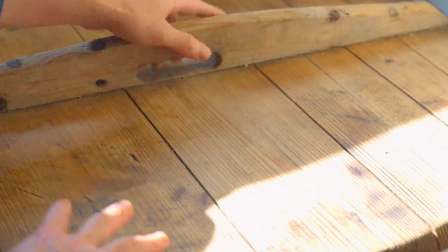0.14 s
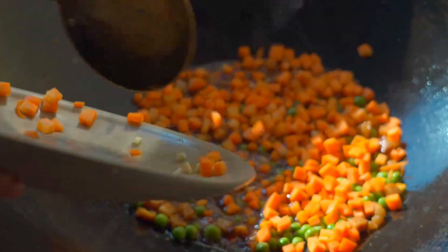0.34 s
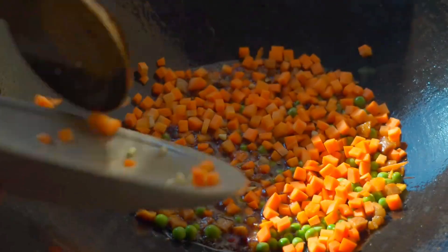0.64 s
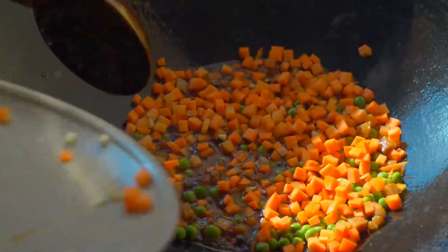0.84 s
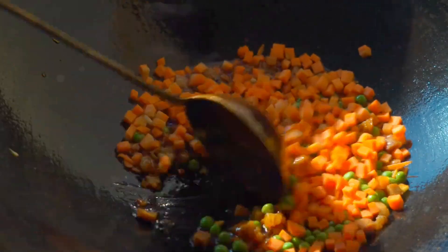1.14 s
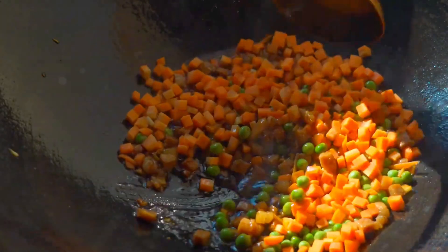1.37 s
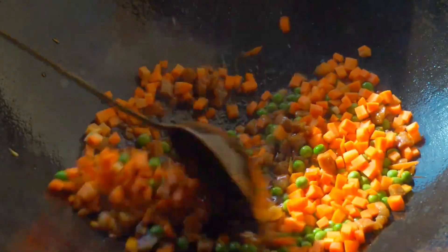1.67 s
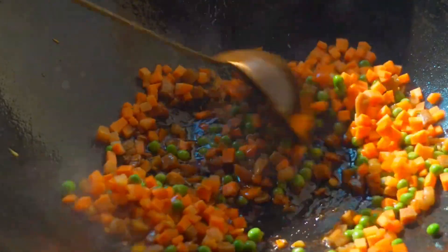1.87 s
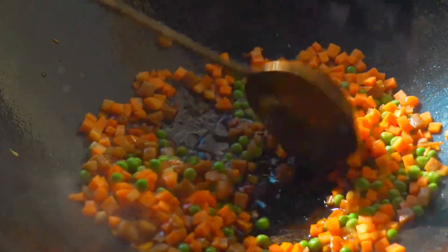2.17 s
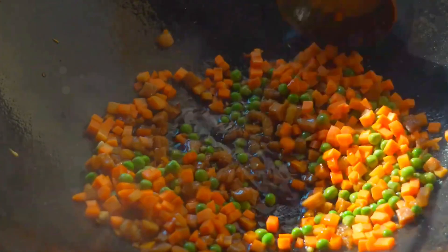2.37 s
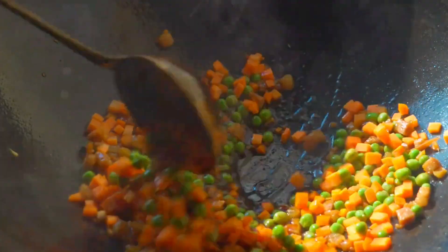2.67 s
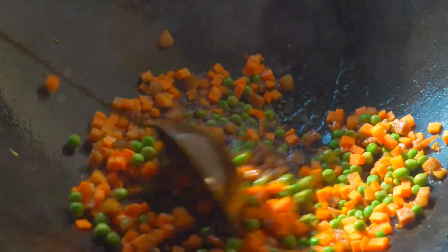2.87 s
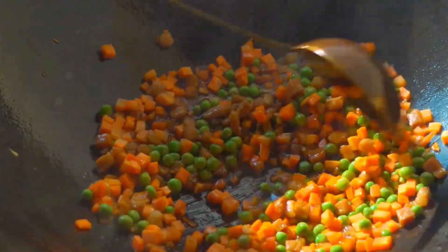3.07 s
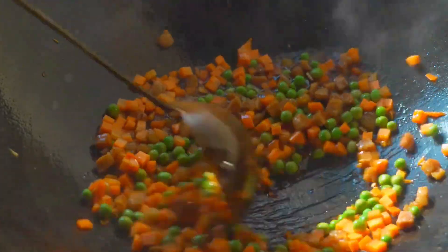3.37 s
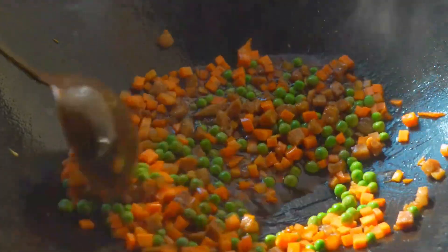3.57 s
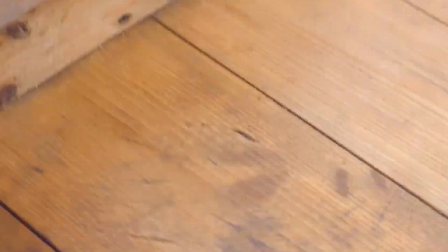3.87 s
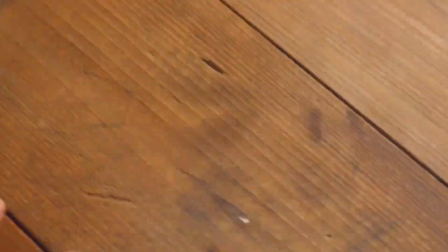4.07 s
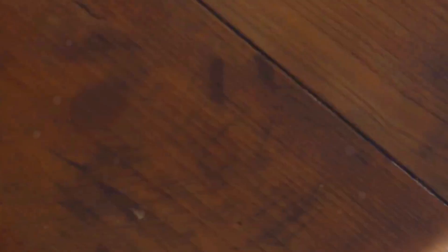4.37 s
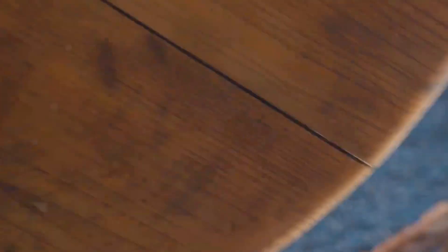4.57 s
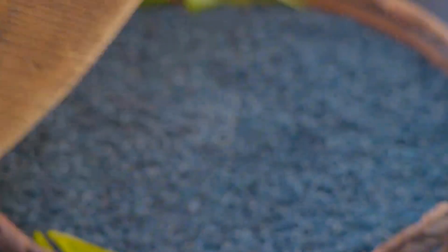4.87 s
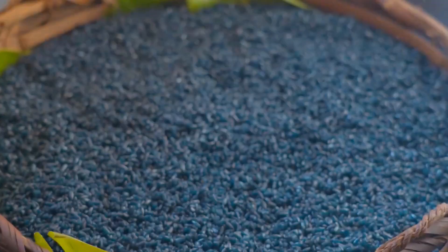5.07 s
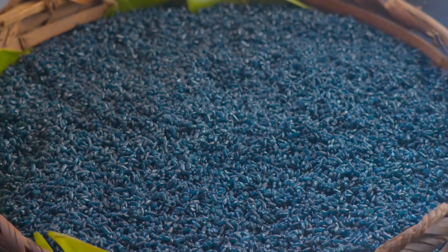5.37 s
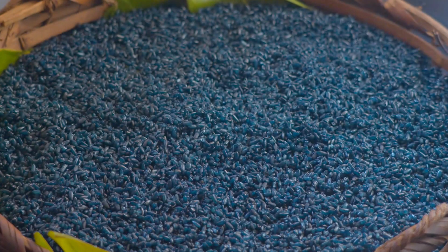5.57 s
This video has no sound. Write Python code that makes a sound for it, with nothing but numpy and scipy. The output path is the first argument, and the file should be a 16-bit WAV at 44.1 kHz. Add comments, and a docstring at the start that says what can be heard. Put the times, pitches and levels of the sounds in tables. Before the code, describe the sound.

Hard-cut cooking sounds: a quiet wooden rub, lively wok frying with clanking, scraping ladle, a tiny hush, then an even hiss of steam.

```python
"""Three moments of cooking joined by hard cuts. First a wooden lid slides in a quiet kitchen: coloured noise, treble lifted.
Then diced vegetables fry in a wok, flickering noise and pops over a droning burner (resonant noise), with spits of oil;
an iron ladle knocks the plate (struck modes), scrapes and squeaks on the steel (random slips through resonances).
After a short hush a steamer boils and hisses, again noise and pops over the burner.
A limiter ducks the sizzle after each loud knock."""
import sys
import numpy as np
from scipy import signal
from scipy.fft import rfft, irfft, next_fast_len
from scipy.io import wavfile

SR = 44100
rng = np.random.default_rng(int(sys.argv[2]) if len(sys.argv) > 2 else 0)


def transcribe(u):
    """Save the signal u as a 16-bit wav file named by the first command-line argument.

    u: samples, shape (n,) or (channels, n), limited to [-1, 1]; the rate is SR.
    q: integer samples, one column per channel.
    """
    v = np.clip(np.atleast_2d(u).T, -1, 1)
    q = np.round(v * 32767).astype(np.int16)
    wavfile.write(sys.argv[1], SR, q)


N = 251811

# quiet kitchen, one list before the frying and one after:
# (time [s], level [dB], treble gain above 1.5 kHz [dB])
HUSH = [
    [(0.0, -43, -2.5), (0.16, -41, 1), (0.19, -32.5, -1), (0.2, -30.5, 8), (0.222, -33, 9), (0.24, -37, 1),
     (0.282, -41, -2), (0.285, -40.5, 4)],
    [(3.762, -35, 14.5), (3.78, -40.5, 9), (3.795, -48, 2), (3.815, -45.5, 3), (3.88, -44, 0),
     (3.893, -40.5, 0)],
]
# spectrum of the quiet kitchen: (frequency [Hz], relative density [dB per Hz])
HUSH_COLOUR = [(15, -47), (25, -26), (75, -24), (108, -15.5), (169, -8.5), (373, -17.5), (497, -15.5),
               (926, -22), (1040, -22.5), (1780, -26.5), (2470, -27), (3000, -31), (4820, -31.5),
               (7600, -56), (9880, -101), (16700, -120)]
# burner drone: (time [s], level [dB])
DRONE = [(.3, -38.5), (1.8, -40), (2.4, -48), (3.76, -48), (3.9, -39.5), (4.3, -43.5), (4.6, -52),
         (5.71, -41.5)]
# boiling steamer: (time [s], level [dB])
BOIL = [(3.9, -23), (4.3, -21.5), (4.52, -23), (5.3, -23), (5.71, -22)]
# spectrum of the steamer: (frequency [Hz], relative density [dB per Hz])
BOIL_COLOUR = [(15, -62), (25, -29), (70, -23.5), (124, -9.5), (215, -12), (254, -7), (391, -8),
               (632, -5.5), (747, -3), (802, -3), (1330, -6.5), (2240, -2), (4280, -3), (5310, -5.5),
               (7600, -30.5), (9880, -46), (16700, -120)]
# sizzle: (time [s], level [dB])
FRY = [(.31, -23.5), (.56, -21.5), (.7, -24.5), (.9, -21), (1.04, -21.5), (1.1, -24), (1.15, -26),
       (1.27, -17), (1.31, -19), (1.35, -16), (1.385, -16), (1.394, -16), (1.412, -18.5), (1.43, -19),
       (1.52, -17), (1.6, -17.5), (1.68, -20.5), (1.71, -21.5), (1.75, -17), (1.84, -15.5), (2.03, -17),
       (2.25, -16.5), (2.295, -18), (2.36, -18), (2.82, -16), (2.857, -15), (2.868, -25), (2.888, -19),
       (2.91, -19), (2.97, -17), (3.22, -16), (3.37, -19), (3.47, -15.5), (3.76, -18.5)]
# spectrum of the sizzle: (frequency [Hz], relative density [dB per Hz])
FRY_COLOUR = [(15, -67.5), (25, -46.5), (70, -30), (200, -15), (220, -19), (347, -10), (602, -11.5),
              (765, -2.5), (1360, -7), (1850, -4.5), (2190, -1.5), (3060, -3.5), (3800, -2), (5310, -3),
              (7600, -21.5), (9880, -42), (16700, -120)]
# how alike left and right are in the noises: (frequency [Hz], likeness [0-1])
LIKENESS = [(30, .65), (70, .55), (140, .62), (300, .76), (600, .98), (1200, .94), (2500, .84), (5000, .81),
            (8000, .9)]
# single loud spits of the oil: (time [s], peak before the band-pass [dB])
SPITS = [(2.892, -5), (2.943, -6), (3.021, -6), (3.475, -7)]
# low modes of the wok: (frequency [Hz], width [Hz], relative level [dB])
WOK = [(361, 79, -7), (478, 86, -2.5), (632, 87, -2), (800, 67, -2.5), (1100, 200, -3.5), (1198, 57, -2.5),
       (1400, 130, 0)]
# ladle strokes: (time of full level [s], hold [s], scrape level [dB], upper modes re lower [dB])
STROKES = [(0.307, 0.3, -23.5, -4), (0.633, 0.013, -20, 7), (0.703, 0.45, -22.5, -7),
           (1.121, 0.062, -19, -4), (1.305, 0.016, -18.5, 4.5), (1.427, 0.035, -15.5, 1.5),
           (1.47, 0.046, -20, -1.5), (1.547, .03, -19, -0.5), (1.605, 0.025, -13.5, 0.5),
           (1.677, 0.01, -20, -2.5), (1.7, 0.02, -17.5, 1), (1.745, 0.03, -21, -4.5), (1.938, .02, -15, 5),
           (1.99, 0.028, -18.5, 5), (2.037, 0.077, -16, -7.5), (2.574, 0.034, -27, -13),
           (2.869, 0.024, -21.5, -14)]
# squeaks and narrow singing lines of the dragged ladle: (start [s], length [s], level before fades [dB],
# frequency [Hz], # width of each of two resonances [Hz])
SQUEAKS = [(0.64, 0.014, -19, 3100, 150), (.676, .02, -24, 3350, 200), (0.673, 0.027, -25, 695, 100),
           (0.669, 0.027, -22, 2290, 150), (1.11, 0.028, -20.5, 2560, 200), (1.16, .008, -20, 2620, 400),
           (1.203, 0.037, -24, 2520, 280), (1.265, 0.015, -16.5, 2544, 280), (1.41, 0.067, -19.5, 1368, 70),
           (1.423, 0.032, -20, 1213, 70), (1.738, 0.055, -24, 1560, 200), (1.755, 0.033, -21.5, 752, 80),
           (1.85, 0.016, -18.5, 1750, 280), (1.937, 0.038, -17, 1425, 110), (2.006, 0.012, -19, 2570, 300),
           (2.031, .008, -17, 2580, 300), (2.056, 0.01, -20, 2500, 300), (2.082, .009, -21, 2530, 300),
           (2.046, 0.037, -21, 1710, 120), (2.129, 0.035, -26, 2830, 200), (2.131, .035, -29, 2270, 150),
           (2.426, 0.035, -22.5, 2620, 280), (2.488, 0.067, -18.5, 2550, 260)]
# ladle knocks: (time [s], peak before the high-pass [dB], contact [ms], main ring [Hz], main t60 [s],
# second ring [Hz], second re main [dB], favoured clink [Hz], clink level [dB], bare crack level [dB])
KNOCKS = [(.299, -10.5, 1.54, 1100, 0.0095, 700, -5, 3130, -8, -22),
          (.548, -17, 1.3, 660, .017, 1200, -8, 2130, -12, -18),
          (0.5853, 4, 1.38, 1520, 0.012, 750, -7.5, 3730, -21, -8),
          (.612, -11, 1.9, 1510, 0.017, 700, -12, 3950, -18, -16),
          (.628, 2.5, 0.53, 1550, 0.043, 717, 0, 2300, -5.5, -13),
          (.660, 1.5, 1.43, 2230, 0.023, 720, -5, 3080, -5, -11),
          (1.051, 0.5, 1.7, 890, 0.013, 725, -4, 2080, -18, -13),
          (1.086, 1, 1.57, 752, 0.017, 1160, -3, 2770, -9, -11),
          (1.113, -7, 1.7, 774, 0.043, 1500, -2, 2600, -12, -22),
          (1.289, 3.5, 0.9, 1176, 0.012, 800, 1.5, 4300, -26, -10),
          (1.397, 3, 1.7, 1350, 0.048, 850, -4, 2250, -17, -14),
          (1.403, 1, 1.4, 1250, 0.024, 555, 4, 2500, -14, -14),
          (1.42, -4, 1.6, 1380, 0.037, 800, -9, 2200, -21, -26),
          (1.431, -2.5, 1.3, 1261, .04, 510, -7, 2180, -17, -24),
          (1.541, -3.5, 2.59, 1210, 0.037, 830, 0, 3400, -19, -22),
          (1.598, -1, 2.24, 1198, 0.054, 814, -2, 3200, -14, -22),
          (1.635, -9, 2.3, 1270, 0.027, 836, -6, 2040, -21, -26),
          (1.676, -11.5, 2.3, 780, 0.066, 440, -5, 2400, -17, -24),
          (1.686, -1, 0.86, 740, 0.02, 490, -4, 2380, -7, -8),
          (1.708, -8, 1.9, 506, 0.04, 1340, -3.5, 2570, -12, -20),
          (1.749, -9, 2.1, 772, 0.05, 1440, 1, 4300, -22, -20),
          (1.936, 2, 1.2, 737, 0.044, 1444, 0, 3320, -15, -17),
          (2.049, -10, 2.1, 760, 0.023, 484, -3, 2600, -9, -15),
          (2.242, -7.5, 0.7, 1000, .01, 600, -8, 2300, 5, 8),
          (2.445, -3, 0.8, 1040, 0.0073, 600, -9, 2610, 1.5, 3),
          (2.860, -0.5, 1.2, 556, 0.007, 1310, 1, 3900, 0, 3.5),
          (2.994, -11.5, 1.2, 900, .011, 600, -9, 2520, 9, 1),
          (3.333, -8, 1.6, 800, 0.01, 600, -7, 2620, 0.5, -8)]
# modes of the ladle: (frequency [Hz], t60 [s])
LADLE = [(2100, 0.013), (2280, 0.02), (2600, 0.02), (2870, 0.03), (3170, 0.035), (3900, 0.011),
         (4300, 0.03)]
# slow part of the stereo width: (time [s], side gain [dB])
WIDTH = [(0, 1), (.15, -4), (.25, -8), (.35, -12), (.45, -0.5), (.6, -6.5), (.85, -2.5), (1.05, -2.5),
         (1.25, -2.5), (1.45, 3), (1.55, 3), (1.65, -3.5), (1.85, 2.5), (2.0, 0.5), (2.15, 2), (2.35, 6),
         (2.5, -3.5), (2.9, -2.5), (3.1, -4.5), (3.6, -2.5), (3.85, -9), (4.0, -7), (4.15, -11),
         (4.4, -1.5), (4.55, -4.5), (4.8, -13.5), (5.05, -1), (5.4, -1), (5.55, -2.5), (5.71, -2)]

FRY_S, BOIL_S = (.2985, 3.758), (3.9, 5.8)  # start and end, seconds
BAND_TOP_HZ, CUTOFF_HZ = 9700, 16000
DRONE_HZ, DRONE_WIDTH_HZ = 248.6, 31.6  # the width of each of two resonances
SPREAD_S, SPREAD_TILT_DB_PER_OCTAVE = (1.1, 1.48), (-2.5, -0.07)  # vegetables being spread: before, after
SPIT_MS = .7
STROKE_ATTACK_S, STROKE_FALL_DB_PER_S = 0.026, 155.5
RUSTLE_DB, RUSTLE_UPPER_DB = -37.5, 9  # a faint rustle stays between strokes
GRIT_SHARE = 0.39  # chatter against the clean blow of a knock
AWAY_DB_PER_OCTAVE = 7  # wok modes far from the main ring answer less
SECOND_T60_SHARE = 0.87  # the second ring dies sooner
ROOM_DB, ROOM_T60_S = -14, 0.25
FLUTTER_DB, FLUTTER_PER_S = 2.5, 23
LIMIT_DB, RELEASE_DB_PER_S = -2.5, 146.5


def from_db(db):
    """Decibels to gain."""
    return 10 ** (np.asarray(db) / 20)


def rms_one(x):
    """Scale to rms 1."""
    return x / np.sqrt(np.mean(x ** 2) + 1e-20)


def in_time(rows):
    """Curve columns at every sample."""
    s, *columns = np.transpose(rows)
    return [np.interp(np.arange(N) / SR, s, column) for column in columns]


def at_hz(points, hz):
    """Table value at a frequency, read on a logarithmic scale."""
    table_hz, values = np.transpose(points)
    return np.interp(np.log(hz), np.log(table_hz), values)


def drift(rate):
    """Smooth random wander of rms 1, low-passed around the rate in Hz."""
    step = 40  # samples between the drawn points
    r = np.exp(-2 * np.pi * rate * step / SR)
    noise = rng.standard_normal(N // step + 2002)
    slow = signal.lfilter([1], [1, -2 * r, r * r], noise)[2000:]
    return np.interp(np.arange(N) / step, np.arange(len(slow)), rms_one(slow))


def during(span, fade_s):
    """1 inside a span, 0 outside, with short fades centred on its ends."""
    t = np.arange(N) / SR
    inside_s = np.minimum(t - span[0], span[1] - t)
    return np.clip(inside_s / fade_s + .5, 0, 1)


def resonance(x, hz, width_hz):
    """Band-pass of gain 1 on top."""
    r = np.exp(-np.pi * width_hz / SR)
    zeros = np.array([1, 0, -1]) * (1 - r * r) / 2
    return signal.lfilter(zeros, [1, -2 * r * np.cos(2 * np.pi * hz / SR), r * r], x)


def ring(x, hz, t60):
    """A unit click sets a decaying sine of height 1 ringing."""
    r, w = 10 ** (-3 / (t60 * SR)), 2 * np.pi * hz / SR
    return signal.lfilter([0, np.sin(w)], [1, -2 * r * np.cos(w), r * r], x)


def pops(per_s, spread_db):
    """Random clicks of uneven size and sign, rms 1."""
    sizes = from_db(spread_db * np.minimum(rng.exponential(1, N), 5)) * rng.choice([-1, 1], N)
    return rms_one(sizes * (rng.random(N) < per_s / SR))


def hiss(colour, per_s, pop_share, patchy_db, surge_db, tilt_db=0):
    """Bursting bubbles over smooth noise, coloured, in half-octave bands that flicker partly on their own."""
    mid = np.sqrt(pop_share) * pops(per_s, spread_db=1.0) + np.sqrt(1 - pop_share) * rng.standard_normal(N)
    side = rng.standard_normal(N)
    size = next_fast_len(N)
    hz = np.maximum(np.fft.rfftfreq(size, 1 / SR), 1)
    alike = at_hz(LIKENESS, hz)
    shape = from_db(at_hz(colour, hz)) * (hz < BAND_TOP_HZ)
    pair = shape * np.array([np.sqrt(1 + alike) * rfft(mid, size), np.sqrt(1 - alike) * rfft(side, size)])
    pair /= np.sqrt(np.mean(np.sum(irfft(pair, size)[:, :N] ** 2, axis=0)))
    out, together_db = 0, surge_db * drift(35)
    for octave in np.arange(-7, 2.5, .5):  # re 2500 Hz
        away = np.log2(hz / 2500) - octave
        window = np.cos(np.pi * np.clip(away, -.5, .5)) ** 2
        band = irfft(pair * window, size)[:, :N]
        gain_db = tilt_db * (max(octave, -3) - 1)  # pivots at 5 kHz
        if octave > -4:  # the bass stays steady
            gain_db = gain_db + together_db + patchy_db * drift(4.1)
        out = out + band * from_db(gain_db)
    return np.array([out[0] + out[1], out[0] - out[1]])


def hush():
    """Room tone as coloured noise; the sliding lid lifts the treble."""
    level_db, treble_db = in_time(HUSH[0] + HUSH[1])
    tone = hiss(HUSH_COLOUR, per_s=2000, pop_share=.1, patchy_db=1.0, surge_db=1.0)
    treble = signal.sosfilt(signal.butter(2, 1500, "high", fs=SR, output="sos"), tone)
    return from_db(level_db) * (tone - treble + from_db(treble_db) * treble)


def burner():
    """Flame noise through one narrow resonance twice, partly its own in each channel."""
    level_db, = in_time(DRONE)
    flame = rng.standard_normal(N) + .45 * rng.standard_normal((2, N))
    once = resonance(flame, DRONE_HZ, DRONE_WIDTH_HZ)
    return from_db(level_db) * rms_one(resonance(once, DRONE_HZ, DRONE_WIDTH_HZ))


def steamer():
    """Water boils under the basket and steam leaks through it: pops in smooth noise."""
    level_db, = in_time(BOIL)
    return from_db(level_db) * hiss(BOIL_COLOUR, per_s=5000, pop_share=0.37, patchy_db=0.5, surge_db=0.2)


def frying():
    """Water bursts out of the vegetables into hot oil; spreading them brightens the sizzle."""
    level_db, = in_time(FRY)
    tilt_db = np.interp(np.arange(N) / SR, SPREAD_S, SPREAD_TILT_DB_PER_OCTAVE)
    sizzle = hiss(FRY_COLOUR, per_s=6000, pop_share=0.4, patchy_db=1.3, surge_db=0.68, tilt_db=tilt_db)
    return from_db(level_db) * sizzle


def spitting():
    """A drop bursts: a few milliseconds of broad noise that swells and dies."""
    length, out = SR // 100, np.zeros(N)
    ms = np.arange(length) / SR * 1000
    swell = ms * np.exp(-ms / SPIT_MS)
    for s, peak_db in SPITS:
        burst = rng.standard_normal(length) * swell
        start = round(s * SR)
        out[start:start + length] += from_db(peak_db) * burst / np.abs(burst).max()
    return signal.sosfilt(signal.butter(4, [400, 5800], "band", fs=SR, output="sos"), out)


def wok_body(x, gains_db):
    """The wok's low modes, each with a gain of its own; little above the highest."""
    body = 0
    for k, ((hz, width_hz, db), gain_db) in enumerate(zip(WOK, gains_db)):
        mode = resonance(x, hz, width_hz) / np.sqrt(width_hz)  # even noise power at any width
        body = body + (-1) ** k * from_db(db + gain_db) * mode
    return signal.sosfilt(signal.butter(4, 1600, fs=SR, output="sos"), body)


def stick_slip():
    """The ladle rim catches and lets go: dense random clicks of wavering strength."""
    return rms_one(pops(6000, spread_db=2.0) * from_db(.6 * drift(50)))


def stroke_controls():
    """Strokes rise, hold and die away; their powers add and weight the balance of the modes."""
    t = np.arange(N) / SR
    power = from_db(2 * RUSTLE_DB) * np.ones(N)
    weighted_upper = power * RUSTLE_UPPER_DB
    for s, hold, level_db, upper_db in STROKES:
        rise = np.clip((t - s) / STROKE_ATTACK_S + 1, 0, 1)
        gain = rise * from_db(level_db - STROKE_FALL_DB_PER_S * np.maximum(t - s - hold, 0))
        power = power + gain ** 2
        weighted_upper = weighted_upper + gain ** 2 * upper_db
    return np.sqrt(power), weighted_upper / power


def scraping(slips):
    """Stick-slip of the dragged ladle drives the wok's modes, which waver a little."""
    scrape, upper_db = stroke_controls()
    gains_db = [upper_db * (hz > 900) + .5 * drift(14.0) for hz, _, _ in WOK]
    return scrape * rms_one(wok_body(slips, gains_db))


def squeaks(slips):
    """At times the same slips lock onto a narrow pitch: two equal resonances in a row."""
    out = np.zeros(N)
    for s, length, level_db, hz, width_hz in SQUEAKS:
        tone = resonance(resonance(slips, hz, width_hz), hz, width_hz)
        out += during((s, s + length), fade_s=0.016) * from_db(level_db) * rms_one(tone)
    return out


def knocks():
    """A blow and brief chatter ring the wok, two main modes and the ladle, plus a bare crack."""
    out, length = np.zeros(N + SR), SR // 8
    ms = np.arange(length) / SR * 1000
    blunt = signal.butter(4, [330, 5600], "band", fs=SR, output="sos")  # no deep bass, blunt contact
    touch = 1. * (ms == 0)
    wok_hz = np.array(WOK)[:, 0]
    for (s, peak_db, contact_ms, hz, t60, second_hz, second_db,
         clink_hz, clink_db, crack_db) in KNOCKS:
        chatter = rng.standard_normal(length) * ms * np.exp(-ms / contact_ms)
        crack = signal.sosfilt(blunt, chatter / np.linalg.norm(chatter))
        blow = signal.sosfilt(blunt, 1. * (np.arange(length) == round(contact_ms * SR / 1000)))
        contact = GRIT_SHARE * crack + (1 - GRIT_SHARE) * blow
        clack = resonance(contact, 1100, 490)
        gains_db = rng.normal(0, 2.1, len(WOK)) - AWAY_DB_PER_OCTAVE * np.abs(np.log2(wok_hz / hz))
        body = wok_body(contact, gains_db)
        swell = np.clip(ms / contact_ms, 0, 1) ** 2  # rings build up during the contact
        main = swell * ring(touch, hz, t60)
        second = swell * ring(touch, second_hz, SECOND_T60_SHARE * t60)
        # ladle modes away from the favoured clink fall by 65 dB per octave
        clink = swell * sum(from_db(-65 * abs(np.log2(mode_hz / clink_hz))) * ring(touch, mode_hz, decay)
                            for mode_hz, decay in LADLE)
        parts = [(-7, clack), (-8, body), (-3.5, main), (second_db - 3.5, second),
                 (clink_db, clink), (crack_db, crack)]
        sound = sum(from_db(db) * part / np.abs(part).max() for db, part in parts)
        start = round(s * SR)
        out[start:start + length] += from_db(peak_db) * sound / np.abs(sound).max()
    return signal.sosfilt(signal.butter(3, 280, "high", fs=SR, output="sos"), out[:N])


def nearby_walls(x):
    """Short diffuse echoes as decaying noise, other ones in each channel."""
    t = np.arange(SR // 4) / SR
    echoes = rng.standard_normal((2, len(t))) * from_db(-60 * t / ROOM_T60_S) * (t > .001)
    echoes /= np.sqrt(np.sum(echoes ** 2, axis=1, keepdims=True))
    return x + from_db(ROOM_DB) * signal.fftconvolve(x[None], echoes, axes=1)[:, :N]


def wavering_width(x):
    """What differs between the channels swells, narrows and flutters quickly."""
    width_db, = in_time(WIDTH)
    mid = (x[0] + x[1]) / 2
    side = (x[0] - x[1]) / 2 * from_db(width_db + FLUTTER_DB * drift(FLUTTER_PER_S))
    return np.array([mid + side, mid - side])


def scene():
    """The three moments, cut together, with the hush wherever nothing cooks."""
    wok, pot = during(FRY_S, fade_s=.004), during(BOIL_S, fade_s=.005)
    slips = stick_slip()
    struck = scraping(slips) + squeaks(slips) + knocks() + spitting()
    cooking = wok * (frying() + nearby_walls(struck)) + pot * steamer() + (wok + pot) * burner()
    return wavering_width(cooking + (1 - wok - pot) * hush())


def record(dry):
    """Limited band, a limiter that lets the first peaks through to clip, steep top cut."""
    x = signal.sosfilt(signal.cheby2(10, 60, BAND_TOP_HZ + 1300, fs=SR, output="sos"), dry)
    over_db = np.maximum(20 * np.log10(np.abs(x).max(axis=0) + 1e-9) - LIMIT_DB, 0)
    slope = RELEASE_DB_PER_S * np.arange(N) / SR
    held_db = np.maximum(np.maximum.accumulate(over_db + slope) - slope, 0)  # falls back at a steady rate
    r = np.exp(-1 / (0.003 * SR))  # 3 ms smoothing slows the attack
    duck_db = signal.lfilter([1 - r], [1, -r], held_db)
    x = np.clip(x * from_db(-duck_db), -1, 1)
    return np.clip(signal.sosfilt(signal.cheby2(12, 70, CUTOFF_HZ, fs=SR, output="sos"), x), -1, 1)


dry = scene()
out = record(dry)
transcribe(out)
```